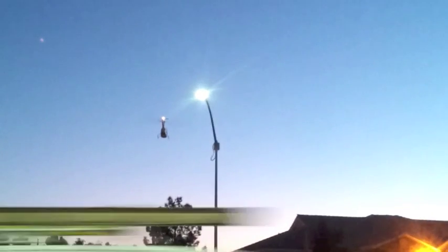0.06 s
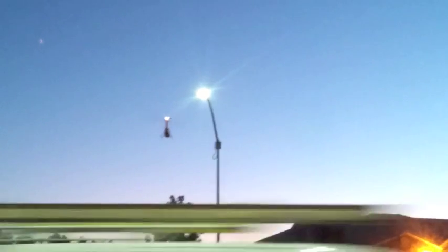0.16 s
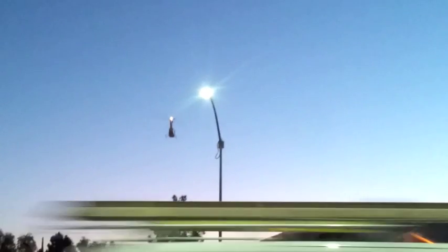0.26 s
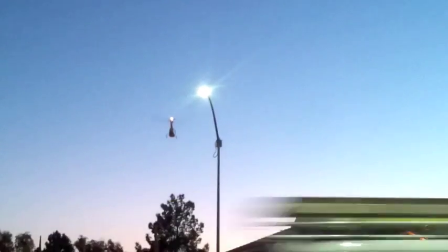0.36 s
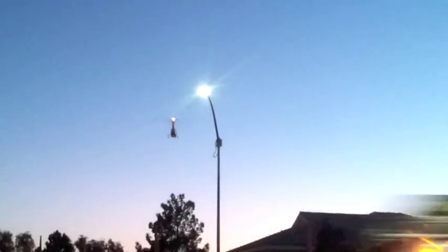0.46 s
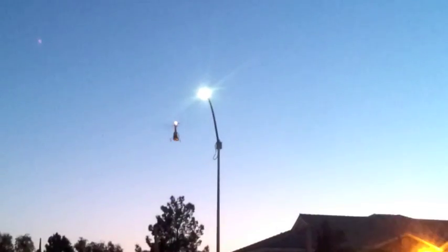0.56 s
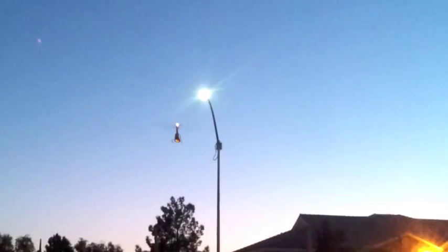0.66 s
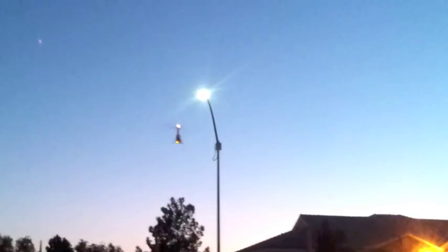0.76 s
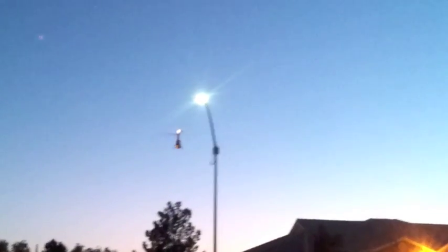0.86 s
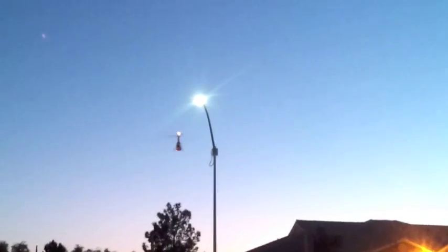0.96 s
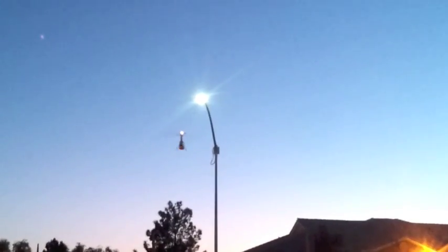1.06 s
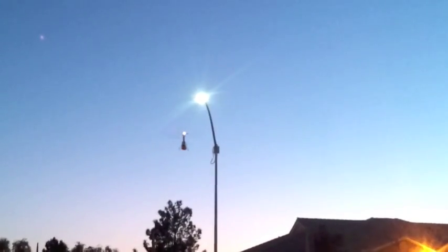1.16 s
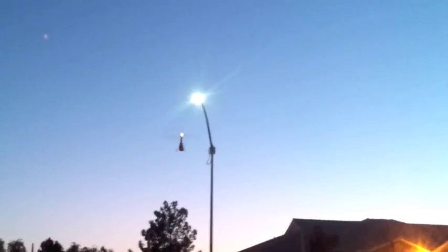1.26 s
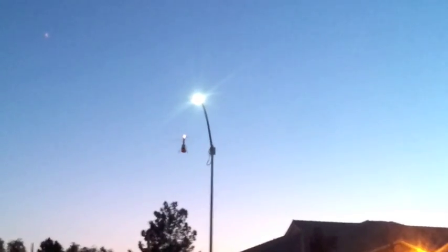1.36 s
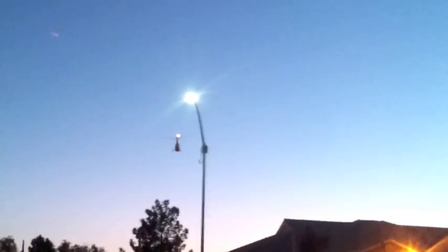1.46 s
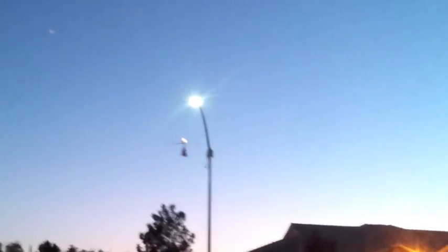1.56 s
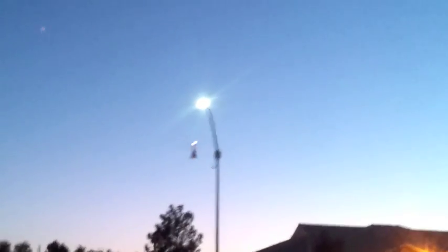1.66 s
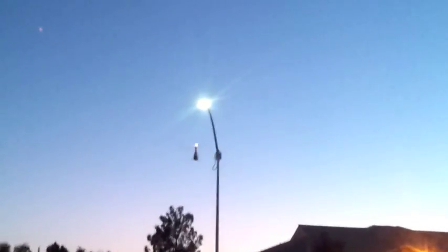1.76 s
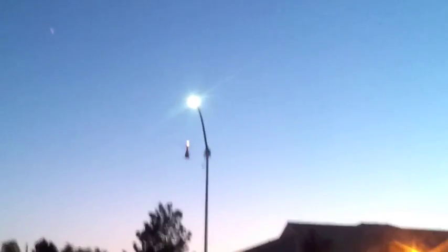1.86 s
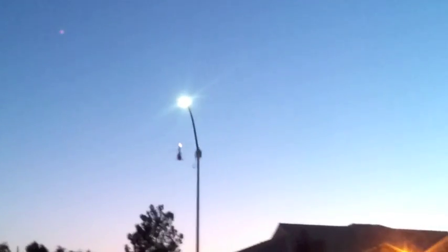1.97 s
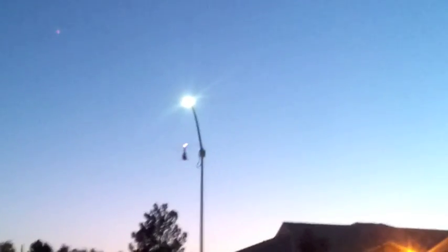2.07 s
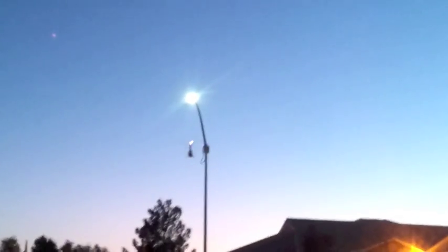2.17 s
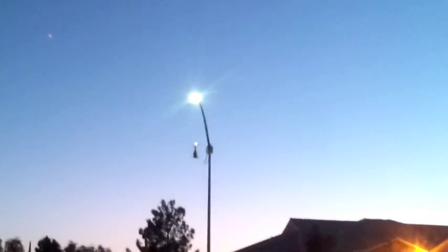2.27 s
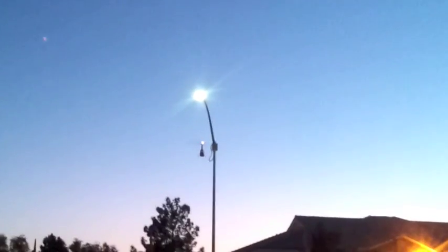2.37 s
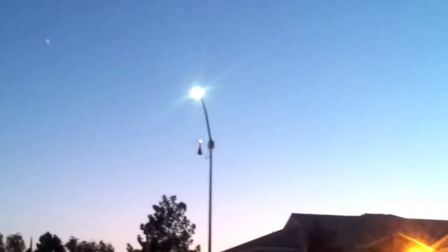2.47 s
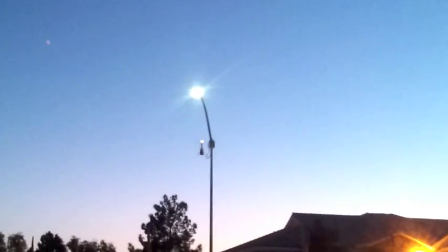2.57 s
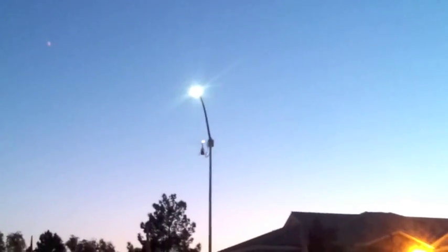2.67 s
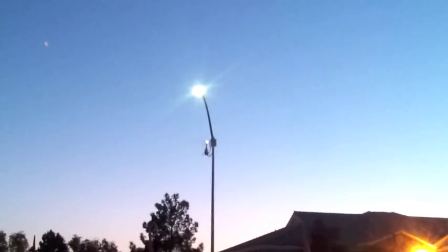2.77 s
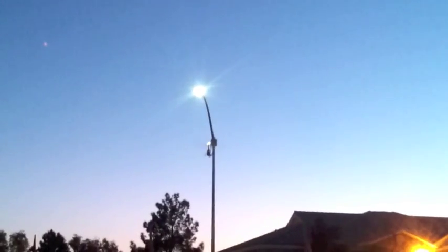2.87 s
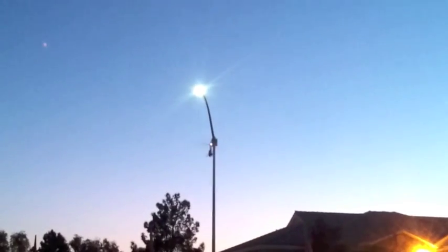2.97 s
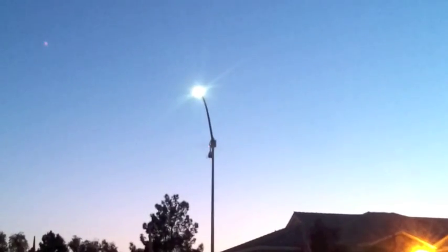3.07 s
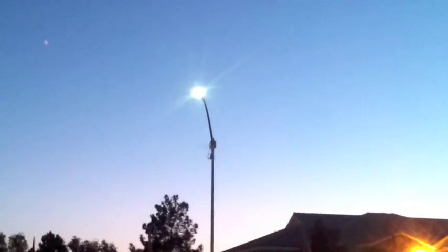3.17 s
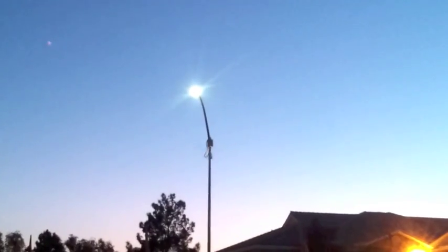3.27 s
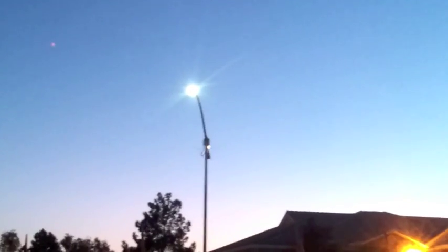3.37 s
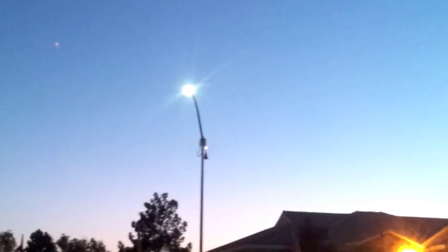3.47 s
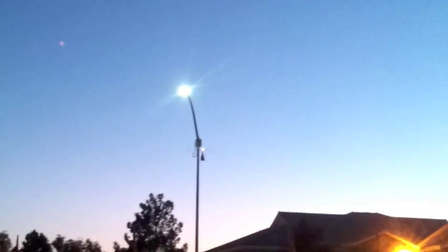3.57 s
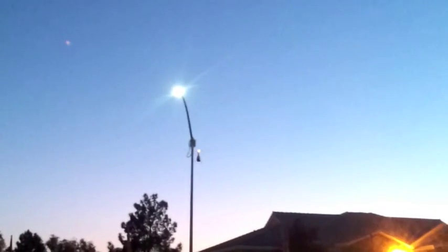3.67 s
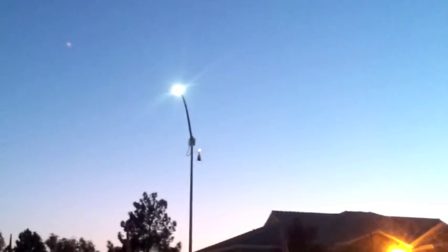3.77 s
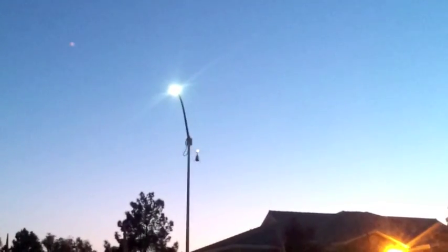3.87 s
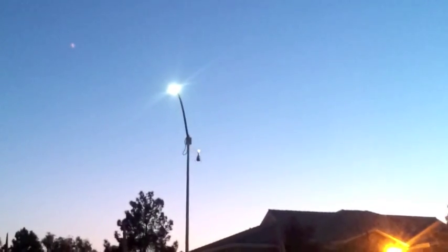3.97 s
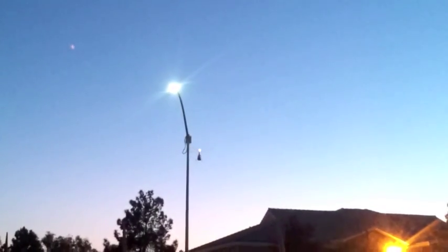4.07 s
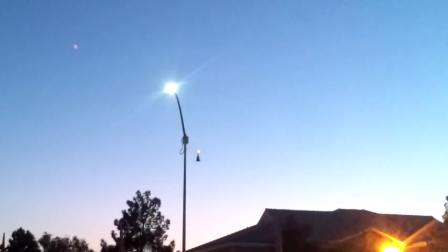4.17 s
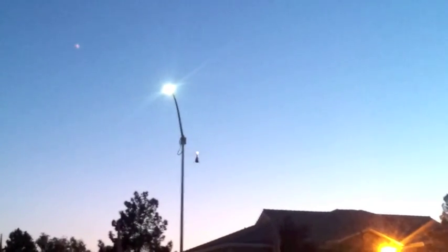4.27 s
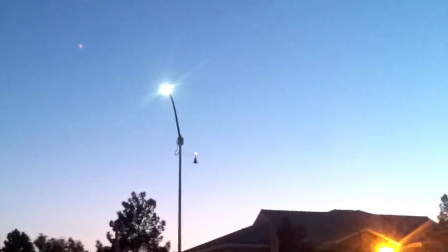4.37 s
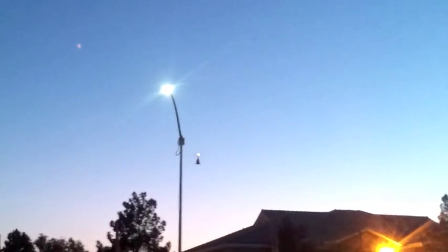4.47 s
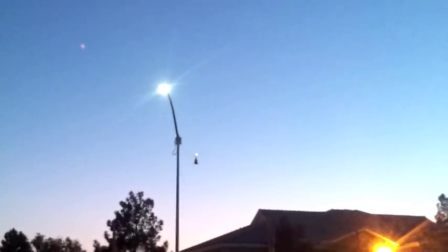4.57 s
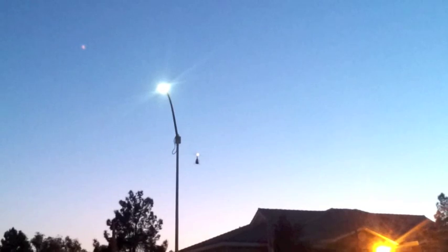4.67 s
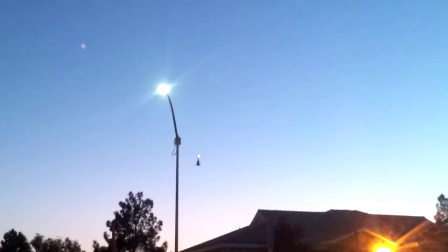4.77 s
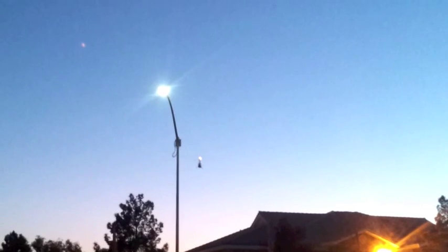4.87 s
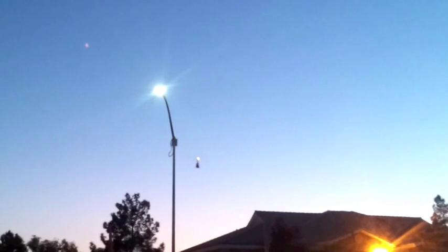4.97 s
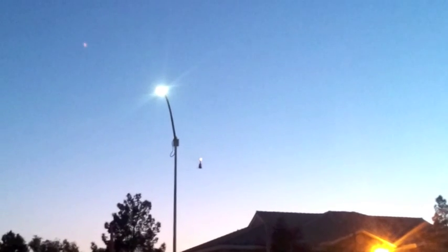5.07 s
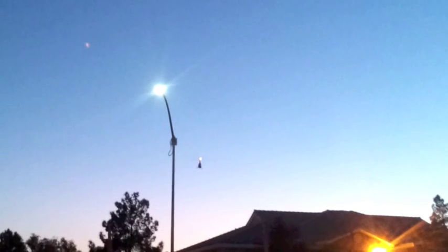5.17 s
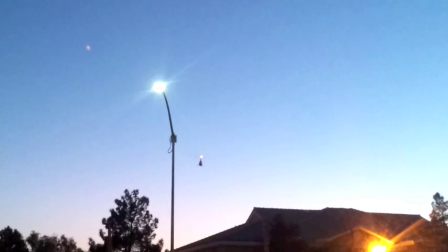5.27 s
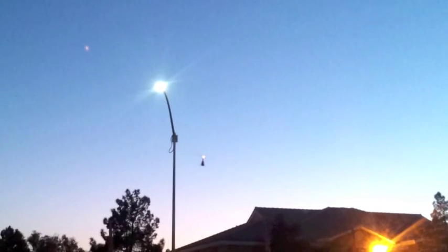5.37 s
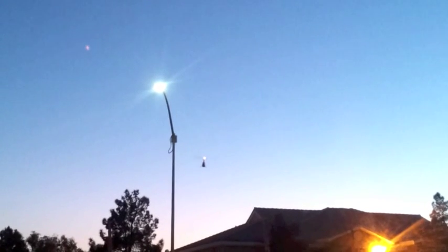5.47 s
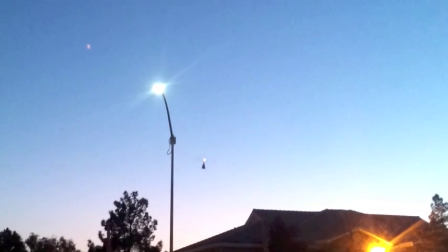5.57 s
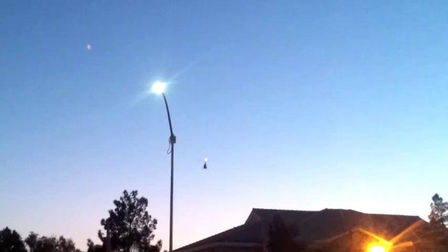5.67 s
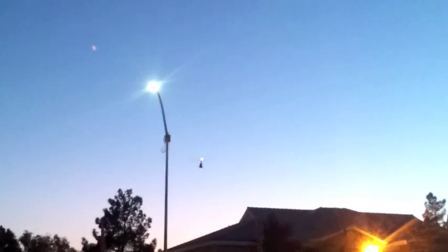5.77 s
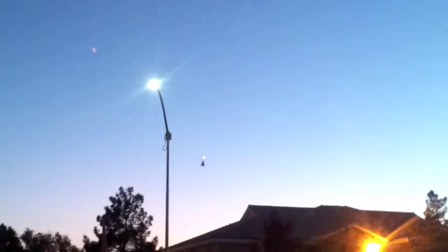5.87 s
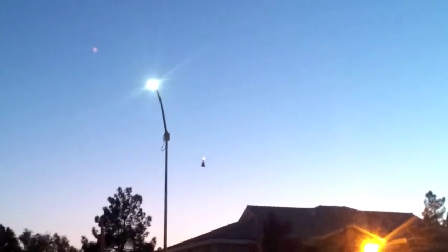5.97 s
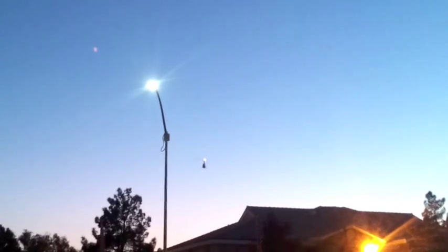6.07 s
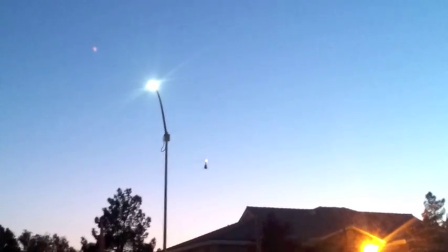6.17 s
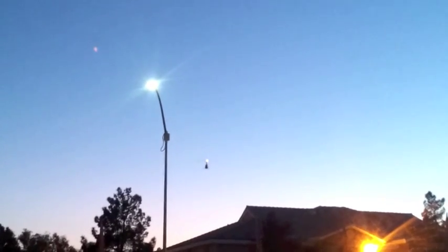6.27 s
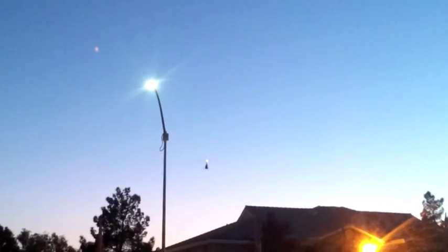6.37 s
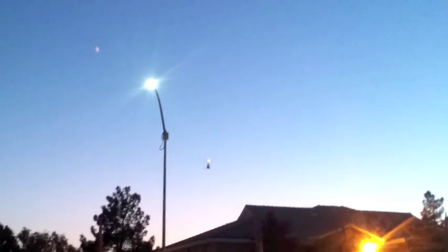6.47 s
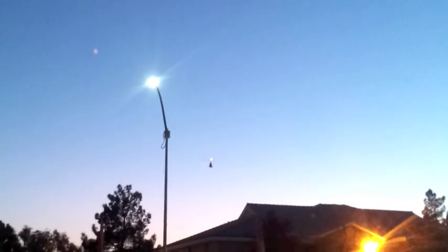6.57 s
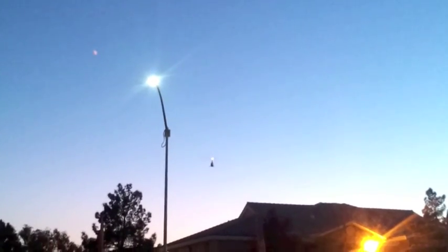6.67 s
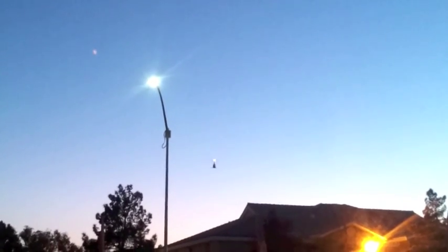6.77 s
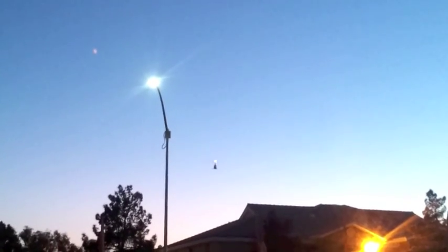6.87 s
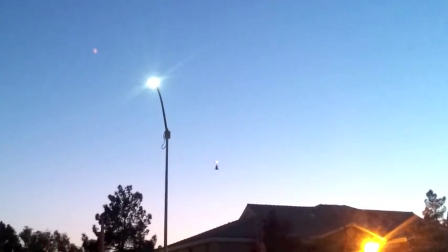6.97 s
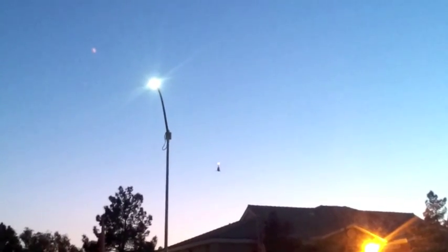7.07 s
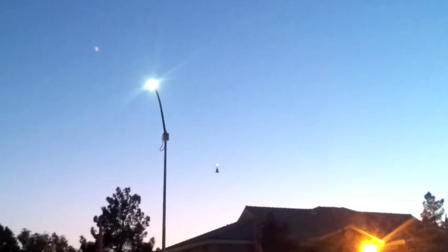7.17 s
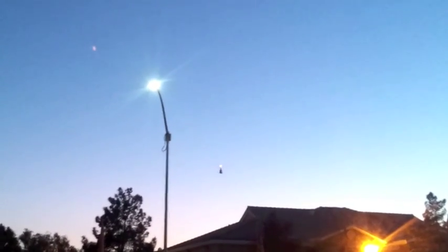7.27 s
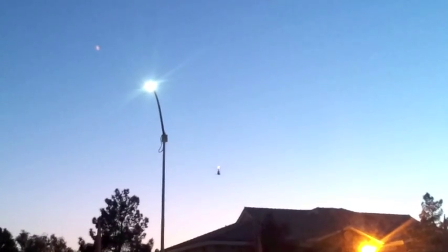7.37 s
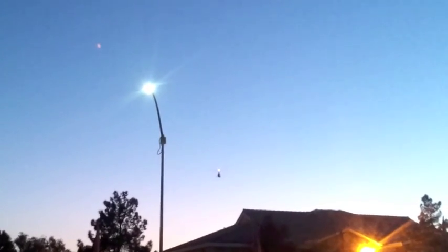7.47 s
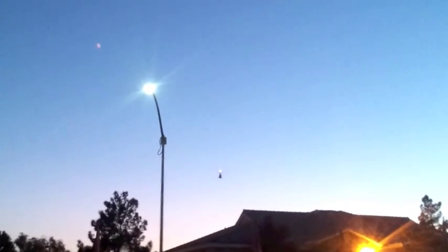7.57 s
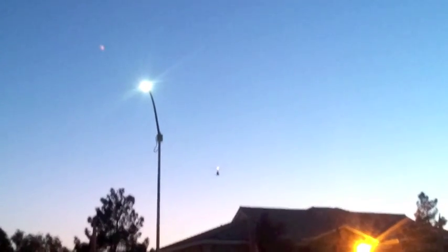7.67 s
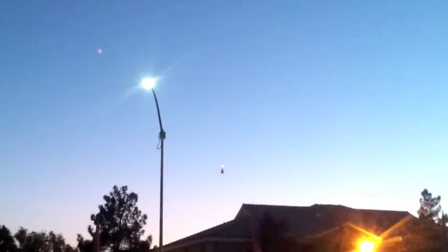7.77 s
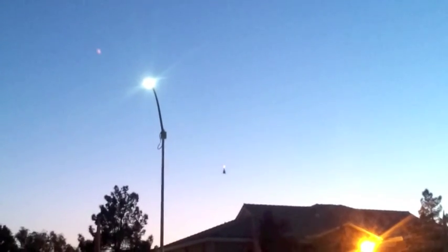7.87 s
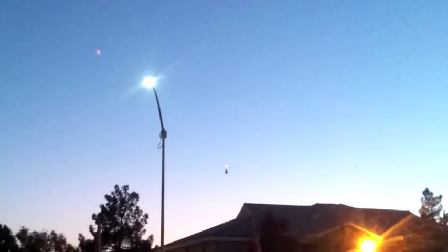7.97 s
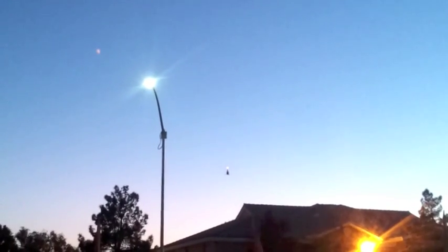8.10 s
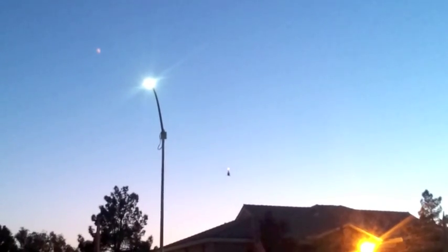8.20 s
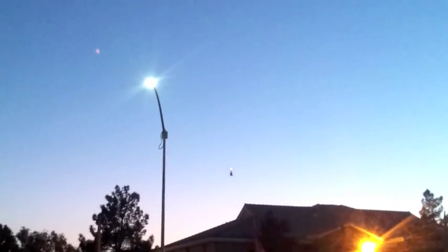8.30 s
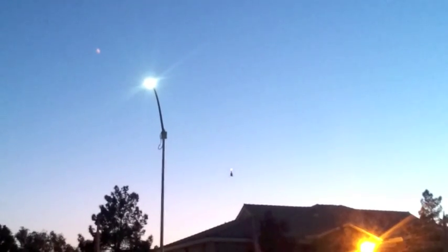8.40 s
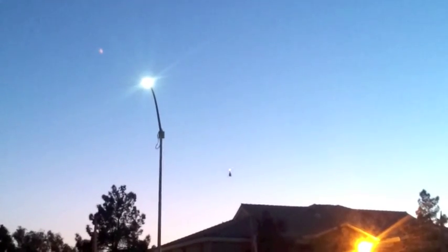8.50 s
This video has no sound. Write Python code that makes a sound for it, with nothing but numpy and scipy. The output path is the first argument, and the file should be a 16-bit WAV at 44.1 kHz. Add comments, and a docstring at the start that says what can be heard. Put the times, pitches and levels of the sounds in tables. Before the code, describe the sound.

A helicopter that has just passed low overhead flies away, its churning roar and turbine hiss surging and fading unevenly over a suburban street.

```python
"""A suburban street: a helicopter has just passed low overhead and flies away, fading unevenly.
Its main rotor makes a churning wash and roar of shaped noise, its turbine hisses, its tail rotor hums in sines.
A delayed, duller reflection and gliding band gains hollow the rush; a narrow noise whistle glides down once.
Close by, a hiss swells twice, a lumpy breeze reaches the microphone and the hand on it knocks and ticks."""
import sys
import numpy as np
from scipy import signal
from scipy.fft import rfft, irfft, next_fast_len
from scipy.io import wavfile
from scipy.ndimage import uniform_filter1d

SR = 44100
rng = np.random.default_rng(int(sys.argv[2]) if len(sys.argv) > 2 else 0)


def master_out(mix):
    """Clip the mix to full scale and print it as 16-bit PCM to the path in sys.argv[1]."""
    frames = np.transpose(np.atleast_2d(mix))
    ceiling = np.clip(frames, -1, 1)
    pcm = np.round(ceiling * 32767).astype(np.int16)
    wavfile.write(sys.argv[1], SR, pcm)


N = 376613
TIME_S = np.arange(N) / SR


def from_db(db):
    """Decibels to amplitude gain."""
    return 10 ** (np.asarray(db) / 20)


def rms_one(x):
    """Scale to an rms of 1."""
    return x / np.sqrt(np.mean(x ** 2) + 1e-20)


def in_time(rows):
    """One curve per column after the time, joined by straight lines."""
    time_s, *columns = np.transpose(rows)
    return [np.interp(TIME_S, time_s, column) for column in columns]


def drift(rate_hz):
    """Slow random curve of rms 1: noise through two equal poles at rate_hz, run at SR / 100."""
    pole = np.exp(-200 * np.pi * rate_hz / SR)
    noise = rng.standard_normal(N // 100 + 1002)
    slow = signal.lfilter([1], [1, -2 * pole, pole ** 2], noise)[1000:]  # skip the settling
    return np.interp(np.arange(N) / 100, np.arange(len(slow)), rms_one(slow))


def turbulence(spectrum, low_hz=15, high_hz=SR / 2):
    """Random flow noise: a spectrum drawn over log frequency, kept between two edges; rms 1."""
    size = next_fast_len(N)
    hz = np.maximum(np.arange(size // 2 + 1) * SR / size, 1)
    points_hz, levels_db = np.transpose(spectrum)
    shape_db = np.interp(np.log(hz), np.log(points_hz), levels_db, left=-np.inf, right=-np.inf)
    edges = ((1 + (low_hz / hz) ** 16) * (1 + (hz / high_hz) ** 16)) ** -.5
    noise = rfft(rng.standard_normal(size))
    return rms_one(irfft(noise * from_db(shape_db) * edges, size)[:N])


def narrow_band(centre_hz, width_hz):
    """Noise round a moving centre: slow noise, read faster for a wider band, on a carrier; rms 1."""
    lowpass = signal.butter(3, 500, fs=SR, output="sos")
    slow = signal.sosfilt(lowpass, rng.standard_normal((2, N)))
    place = np.cumsum(np.clip(width_hz * np.ones(N), 20, 1000)) / 1000
    in_phase, quadrature = (np.interp(place, np.arange(N), row) for row in slow)
    phase = 2 * np.pi * np.cumsum(centre_hz) / SR
    return rms_one(in_phase * np.cos(phase) + quadrature * np.sin(phase))


def sliding_band(rows):
    """A noise resonance that follows its own centre, level and width."""
    hz, level_db, width_hz = in_time(rows)
    return from_db(level_db) * narrow_band(hz, width_hz)


def swells(rows):
    """Gain of smooth Gaussian rises and falls, one for each row."""
    return sum(from_db(db) * np.exp(-.5 * ((TIME_S - s) / width_s) ** 2) for s, db, width_s in rows)


def throb(turns, depth):
    """Gain that swells once for each passing blade."""
    return 1 + depth * np.cos(2 * np.pi * turns)


def partial(turns, level_db, fade_db, wander_rad):
    """One rotor harmonic; moving air makes its level and phase waver."""
    level = np.sqrt(2) * from_db(level_db + fade_db * drift(3.8))
    return level * np.sin(2 * np.pi * turns + wander_rad * drift(2.1))


def knock(start_s, level_db, pitch_hz, t60_s, crack=0):
    """A short blow that builds within about a quarter cycle and rings briefly, perhaps with a gritty crack."""
    age_s = TIME_S[:SR // 10]
    attack = 1 - np.exp(-(4 * pitch_hz * age_s) ** 2)
    decay = from_db(level_db - 60 * age_s / t60_s)
    ring = np.sin(2 * np.pi * pitch_hz * age_s) + crack * rng.standard_normal(len(age_s))
    return np.pad(attack * decay * ring, (round(start_s * SR), N))[:N]


# roar jumps and drop-outs as blades meet their own wake: (time [s], level [dB], length [s])
BURSTS = [(.87, 2.5, .018), (.96, 3, .02), (1.105, 3, .018), (1.32, 3, .016), (1.348, -3, .018),
          (1.42, 3, .018), (2.48, 2, .016), (2.56, 2.5, .016), (2.815, 2.5, .024), (2.84, -4, .016),
          (2.888, -2.5, .022), (3.005, -2.5, .022), (3.031, 2.5, .03), (3.108, 1.5, .02),
          (3.132, -2.5, .022), (3.236, 3, .012), (3.298, 3.5, .03), (3.332, -2.5, .028), (5.02, 2.5, .025),
          (5.51, 2.5, .03), (5.706, -3, .017), (5.782, 1.5, .05), (7.066, -3, .012), (7.078, 2, .01),
          (7.975, 2.5, .05), (8.24, 2.5, .05)]
BURST_EDGE_S = .003


def bursts():
    """Gain of the roar as it jumps or drops for a moment, with smoothed edges."""
    steps_db = sum(db * ((TIME_S >= s) & (TIME_S < s + length_s)) for s, db, length_s in BURSTS)
    return from_db(uniform_filter1d(steps_db, round(BURST_EDGE_S * SR)))


# low wash spectrum: (frequency [Hz], relative density [dB])
WASH = [(70, -18), (110, -9.5), (150, -2.5), (220, -2), (290, -2.5), (380, -6), (460, -6.5), (520, -11.5),
        (580, -11.5), (700, -19.5)]
# low wash level: (time [s], level [dB])
WASH_LEVEL = [(0, -25.5), (1.7, -24), (2.05, -21.5), (3.0, -22.5), (3.7, -26), (5.6, -27.5), (6.9, -26),
              (7.45, -22.5), (7.8, -26), (8.54, -25.5)]
# brief throbs of the low wash: (time [s], level [dB], half-width [s])
THROBS = [(.53, -18.5, 0.01), (.9, -17.5, 0.014), (2.98, -22.5, .02), (3.4, -18, 0.013), (4.87, -22, .02)]
# low boom in the loudest surge: (time [s], centre [Hz], level [dB], width [Hz])
BOOM = [(1.5, 189.7, -63, 99.7), (2.05, 204.4, -31, 99.8), (2.55, 255, -28, 119.7),
        (3.05, 275.6, -29, 119.9), (3.45, 281.6, -32, 119.6), (3.9, 270.4, -57, 124)]
# blade roar spectrum: (frequency [Hz], relative density [dB])
ROAR = [(440, -20.5), (550, -6.5), (660, 0), (780, -1), (980, 1.5), (1250, -0.2), (1600, 0.5), (2000, -3.5),
        (2400, -12), (2900, -22.5), (3600, -49)]
# roar surging on its way through the air: (time [s], body level [dB], bright edge level [dB])
SURGE = [(0, -21.5, -23.5), (.7, -18.5, -21), (1.35, -18, -21), (1.75, -21, -22.5), (2.5, -16.5, -19),
         (3.1, -20.5, -25.5), (3.65, -25, -30), (4.0, -23.5, -28.5), (4.3, -26, -29.5), (5.15, -29.5, -30),
         (5.55, -27.5, -28.5), (5.74, -26.5, -29), (5.84, -27, -25.5), (6.05, -24, -23.5),
         (6.65, -21, -21.5), (7.1, -25.5, -28.5), (7.6, -25, -29), (8.54, -29, -35)]
# throaty moving band of the roar: (time [s], centre [Hz], level [dB], width [Hz])
THROAT = [(0, 832, -20, 242.3), (.4, 765, -23.5, 240.2), (.6, 992, -37, 301.8), (.9, 1061, -23, 283.7),
          (1.4, 1061, -22, 298.2), (2.0, 1233, -21.5, 450), (2.35, 1002, -18, 654.5),
          (2.65, 820, -19.5, 302), (3.05, 830, -19.5, 278.8), (3.35, 879, -28.5, 298),
          (3.7, 961, -31, 278.8), (4.3, 857, -27.5, 258.4), (4.75, 902, -33.5, 217.8),
          (5.3, 956, -33.5, 222.4), (5.85, 1048, -25, 401), (6.5, 889.7, -30, 259.4),
          (7.05, 843, -23, 219.7), (7.4, 858.6, -28.5, 218.8), (7.7, 826, -34, 250.8),
          (8.54, 938, -33, 201.3)]
# moving band above the throat: (time [s], centre [Hz], level [dB], width [Hz])
RASP = [(2.4, 2500, -56, 398.6), (3.0, 2210, -32, 392.8), (3.6, 2200, -61, 405), (4.3, 2565, -49, 299.8),
        (4.85, 2296, -42, 300.6), (5.3, 2290, -61, 304.6), (6.6, 2607, -43, 295.8), (7.0, 2340, -33, 448),
        (7.4, 2257, -32.5, 418.6), (7.9, 2130, -51, 302.1), (8.54, 2120, -48, 293)]
# weak overtones: (multiple of main blade rate [1], level relative to wash [dB])
ROTOR_LINES = [(3, -29.5), (10, -18), (14, -23.5), (16, -22), (21, -26.5)]
FLUTTER_DB, FLUTTER_HZ = 0.41, 24  # quick surges of the roar in uneven air


def main_rotor(turns, chop):
    """Blade-shed eddies: low wash and gusty tip roar, chopped at the blade rate, over faint overtones."""
    wash_db, = in_time(WASH_LEVEL)
    roar_db, edge_db = in_time(SURGE)
    wash = from_db(wash_db) * turbulence(WASH)
    wash += swells(THROBS) * turbulence(WASH, high_hz=260)
    wash += sliding_band(BOOM)
    roar = from_db(roar_db) * turbulence(ROAR, high_hz=1330)
    roar += from_db(edge_db) * turbulence(ROAR, low_hz=1346)
    roar += sliding_band(THROAT) + sliding_band(RASP)
    flutter = from_db(FLUTTER_DB * drift(FLUTTER_HZ)) * bursts()
    lines = sum(partial(k * turns, wash_db + db, fade_db=6.5, wander_rad=0.54) for k, db in ROTOR_LINES)
    return (wash + roar * flutter) * throb(turns, chop) + lines


# turbine hiss spectrum: (frequency [Hz], relative density [dB])
HISS = [(1900, -10), (2500, 11), (3100, 8), (3800, 6), (5000, 2), (6300, 3), (7400, -3), (8300, -7),
        (9600, -21), (10600, -43), (11200, -51.5)]
# slow waves of the hiss: (time [s], hiss level [dB], highest hiss level [dB])
TURBINE = [(0, -39.5, -38), (.55, -37.5, -54), (.78, -38.5, -42), (.97, -36.5, -54), (1.2, -35, -37),
           (1.6, -36, -39.5), (2.0, -39.5, -37.5), (2.45, -37, -35), (3.0, -32, -31.5), (3.35, -36.5, -44),
           (3.95, -44, -46.5), (4.45, -41, -40), (4.85, -38, -46), (5.55, -44.5, -48.5), (5.95, -40, -42.5),
           (6.2, -41, -45), (6.5, -43, -37), (6.8, -40, -36.5), (7.1, -36, -36), (7.55, -36.5, -47),
           (8.05, -40, -46.5), (8.54, -44, -50.5)]
# bright ridge sliding through the hiss: (time [s], centre [Hz], level [dB], width [Hz])
RIDGE = [(.55, 4500, -61, 800), (.97, 5000, -39, 801.2), (1.3, 5814, -50, 904), (1.9, 5900, -39, 956),
         (2.25, 5682, -45, 943), (2.55, 4876, -39, 903), (3.0, 3750, -38, 698), (3.5, 3694, -43.5, 796),
         (4.2, 4400, -55, 802), (4.75, 3950, -46, 800), (5.3, 3800, -48, 695.3), (6.3, 4190, -59, 499),
         (6.62, 4250, -50, 399), (6.9, 4200, -63, 401.6), (7.3, 4015, -43, 600), (7.9, 3960, -46, 700),
         (8.54, 3790, -58, 695)]


def turbine(turns, chop):
    """Exhaust hiss, stirred by the downwash; the air lets its highest part through unevenly."""
    hiss_db, sheen_db = in_time(TURBINE)
    hiss = from_db(hiss_db) * turbulence(HISS, high_hz=4640)
    sheen = from_db(sheen_db) * turbulence(HISS, low_hz=4440)
    return (hiss + sheen + sliding_band(RIDGE)) * throb(turns, chop)


HUM_ORDERS = (2, 3, 4)  # multiples of the tail rotor's blade rate
# separate fades of the hum: (time [s], second level [dB], third level [dB], fourth level [dB])
HUM = [(0, -32, -26, -30), (.3, -31.5, -35, -31), (.5, -30, -46, -26), (.75, -26.5, -46, -36),
       (.95, -27.5, -29, -24.5), (1.3, -39.5, -41, -33.5), (1.6, -30, -43, -29), (2.15, -32.5, -25, -34),
       (2.55, -39, -33, -26), (2.85, -43, -30, -49), (3.2, -36, -34.5, -48), (3.65, -31, -31, -36),
       (4.1, -30, -38, -27.5), (4.5, -40, -31.5, -54), (5.2, -37.5, -32, -38.5), (5.85, -36.5, -34.5, -33),
       (6.4, -33, -37, -33), (7.0, -34.5, -43, -44), (7.45, -32, -41, -35.5), (8.0, -34, -35, -32.5),
       (8.54, -51, -45, -52)]
HUM_WANDER_RAD, HUM_SETTLE_S = 0.86, 5.2  # phase waver, easing as the machine draws away
HUM_FAR_FADE_DB, HUM_NEAR_FADE_DB = 0.9, 1.5  # level waver far away, and what nearness adds


def tail_rotor(turns):
    """The hum: three blade-rate harmonics fading in and out, wavering most while the machine is near."""
    near = np.exp(-TIME_S / HUM_SETTLE_S)
    fade_db = HUM_FAR_FADE_DB + HUM_NEAR_FADE_DB * near
    wander_rad = HUM_WANDER_RAD * near
    return sum(partial(k * turns, db, fade_db, wander_rad) for k, db in zip(HUM_ORDERS, in_time(HUM)))


# reflection from a hard surface nearby: (time [s], delay [ms], strength [0-1])
REFLECTION = [(0, 0.98, 0.01), (.5, 1, 0), (1.1, 0.89, 0.08), (1.8, 0.84, 0.03), (2.4, 0.8, 0.16),
              (3.0, 0.77, 0.03), (3.6, 0.91, 0.07), (4.35, 1.23, 0.06), (4.85, 1.32, 0.25),
              (5.4, 1.56, 0.09), (6.2, 1.3, 0.02), (6.65, 1.06, 0.16), (7.05, 1.23, 0.2), (7.4, 1.29, 0.46),
              (7.7, 1.3, 0.25), (7.9, 1.43, 0.12), (8.54, 1.24, 0.09)]


def reflected(x, dull_hz):
    """A slightly later, duller copy cuts moving notches into the sound."""
    delay_ms, strength = in_time(REFLECTION)
    soft = signal.sosfiltfilt(signal.butter(2, dull_hz, fs=SR, output="sos"), x)
    echo = np.interp(TIME_S - delay_ms / 1000, TIME_S, soft)
    return (x + strength * echo) / np.sqrt(1 + strength ** 2)


# breeze spectrum: (frequency [Hz], relative density [dB])
BUFFET = [(30, -21), (42, -6), (58, 7.5), (80, 6), (110, 6), (150, -14), (250, -22.5), (600, -44.5)]
# puffs of the breeze: (time [s], level [dB], half-width [s])
GUSTS = [(.62, -36, 0.054), (1.9, -40, 0.078), (3.1, -45.5, 0.4), (6.1, -41, 0.45), (6.9, -40, 0.024),
         (7.3, -29, 0.064), (7.43, -27.5, 0.042), (7.57, -36, 0.04), (7.69, -28, 0.05), (8.02, -29, 0.088),
         (8.4, -32, 0.15)]
BREEZE_DB, BREEZE_LULL_DB_PER_S = -36, 1.26


def breeze(lumps_db):
    """Lumpy rumble of air on the microphone: a slowly easing draught with a few puffs."""
    flow = from_db(BREEZE_DB - BREEZE_LULL_DB_PER_S * TIME_S) + swells(GUSTS)
    return flow * from_db(lumps_db * drift(4.8)) * turbulence(BUFFET)


# close hiss spectrum: (frequency [Hz], relative density [dB])
SWISH = [(3000, -27), (4500, -3.5), (5500, 4), (6400, 7), (7000, 3.5), (7800, -6), (9000, -20),
         (11000, -48)]
# swells of the close hiss: (time [s], level [dB], half-width [s])
SWELLS = [(.18, -33.5, 0.35), (1.27, -30.5, 0.19)]


def swishes(grain_db):
    """A slightly grainy, bright hiss rises and falls."""
    return swells(SWELLS) * turbulence(SWISH) * from_db(grain_db * drift(40))


# gliding bands that swell (+) or hollow out (-):
# (time [s], half-width [s], centre [Hz], slide [Hz/s], level change [dB], width [Hz])
SWEEPS = [(.3, 0.18, 895, 4, -3.5, 159), (1.8, 0.16, 860, -150, 4, 200), (2.0, .28, 7700, 1, -3, 1000),
          (2.0, .17, 4500, 0, 4.5, 1000), (2.25, 0.15, 2820, -2, -5.5, 350), (2.7, 0.36, 735, -69, 3.5, 80),
          (2.75, .2, 4300, -2, -4, 900.7), (3.2, .1, 604, -200, 3.5, 89.5),
          (3.65, 0.28, 5200, 0, 3.5, 1200), (4.5, 0.16, 740, -150, 2, 160),
          (4.85, .3, 1900, -350, -6, 220.1), (5.08, 0.11, 980, 0, 5.5, 129.5),
          (5.5, 0.16, 1496, -300, 7, 200), (5.85, 0.11, 1328, -300, 3.5, 170), (6.1, .2, 3085, 3, -6, 300),
          (6.75, 0.26, 6000, -300, -9.5, 1200), (7.1, 0.23, 3033, -600, 3.5, 349),
          (7.25, .3, 1899, -200, 2, 140), (7.6, .4, 1270, 0, -1.5, 159)]


def sweeps(x):
    """Paths through the air add and cancel: each sweep lifts or hollows one gliding band for a moment."""
    out = x.copy()
    for s, half_s, hz, slide_hz_per_s, db, width_hz in SWEEPS:
        near = np.abs(TIME_S - s) < 3 * half_s
        age_s = TIME_S[near] - s
        carrier = np.exp(2j * np.pi * (hz + slide_hz_per_s * age_s / 2) * age_s)
        narrow = signal.butter(2, width_hz / 2, fs=SR, output="sos")
        # shift the band to 0 Hz, isolate it, shift it back
        band = 2 * np.real(signal.sosfiltfilt(narrow, x[near] / carrier, padtype=None) * carrier)
        gain = from_db(db * np.exp(-.5 * (age_s / half_s) ** 2))
        out[near] += (gain - 1) * band
    return out


# thin falling whistle: (time [s], frequency [Hz], level [dB])
WHISTLE = [(1.7, 10250, -101), (1.92, 9270, -59), (2.05, 9100, -52), (2.25, 8100, -64), (2.48, 7217, -42),
           (2.62, 6840, -44), (2.8, 6310, -59), (3.0, 5870, -94)]


def whistle(width_hz):
    """A thin, airy tone gliding down: narrow noise on a falling centre."""
    hz, level_db = in_time(WHISTLE)
    return from_db(level_db) * narrow_band(hz, width_hz)


# hardest blade slaps: (time [s], level before decay [dB], pitch [Hz], t60 [s])
SLAPS = [(2.803, -5, 1190, 0.01), (3.0315, -9, 903, 0.03), (3.087, -6, 750, 0.0054),
         (7.0795, -8.5, 890, 0.026)]


def slaps():
    """Now and then a blade strikes its wake with a hard clap."""
    return sum(knock(*row) for row in SLAPS)


# dull handling knocks and bumps: (time [s], level before decay [dB], pitch [Hz], t60 [s])
BUMPS = [(5.724, -5, 1214, 0.0082), (5.7243, -27, 4100, 0.0035), (5.7301, -6, 680, 0.01),
         (6.893, -7, 230.2, 0.028), (7.424, -3.5, 126, 0.032), (7.5751, 1.5, 168, 0.015)]
# casing ticks: (time [s], level before decay [dB], pitch [Hz], t60 [s], crack [0-1])
TICKS = [(7.7231, -26.5, 5870, 0.01, 0.28), (7.89, -29, 6360, 0.0074, 0.64),
         (8.091, -23.5, 6070, 0.011, 0.1), (8.266, -27, 6110, 0.0066, 0.01), (8.4924, -37, 6200, .007, .05),
         (8.507, -30, 6100, .007, 0)]


def handling():
    """Fingers shift on the casing: short damped knocks, bumps and ticks."""
    return sum(knock(*row) for row in BUMPS + TICKS)


BLADE_HZ, SAG_HZ_PER_S = 63.9, .178  # tail blade rate, sinking as the machine draws away
MAIN_TO_TAIL = 1 / 3  # ratio of blade rates


def scene():
    """The helicopter and its reflection, with the small sounds at the microphone."""
    tail_turns = np.cumsum(BLADE_HZ - SAG_HZ_PER_S * TIME_S) / SR
    main_turns = tail_turns * MAIN_TO_TAIL
    rush = main_rotor(main_turns, chop=0.031) + turbine(main_turns, chop=.04)
    rush += whistle(width_hz=220) + slaps()
    near = swishes(grain_db=1.5) + breeze(lumps_db=1.1) + handling()
    return (sweeps(reflected(rush, dull_hz=4000)) + tail_rotor(tail_turns) + near)[None]


MICROPHONE_LOW_HZ, CUTOFF_HZ = 37, 14400
CEILING = .88  # full-scale fraction


def record(dry):
    """The small microphone loses the deepest bass and rounds the highest peaks; the top is cut steeply."""
    thin = signal.sosfilt(signal.butter(4, MICROPHONE_LOW_HZ, "high", fs=SR, output="sos"), dry)
    rounded = thin / (1 + (thin / CEILING) ** 8) ** (1 / 8)
    return signal.sosfilt(signal.ellip(10, .1, 90, CUTOFF_HZ, fs=SR, output="sos"), rounded)


dry = scene()
out = record(dry)
master_out(out)
```